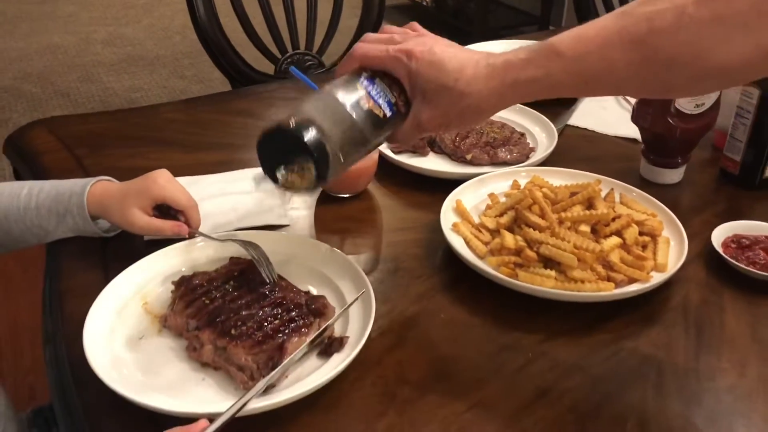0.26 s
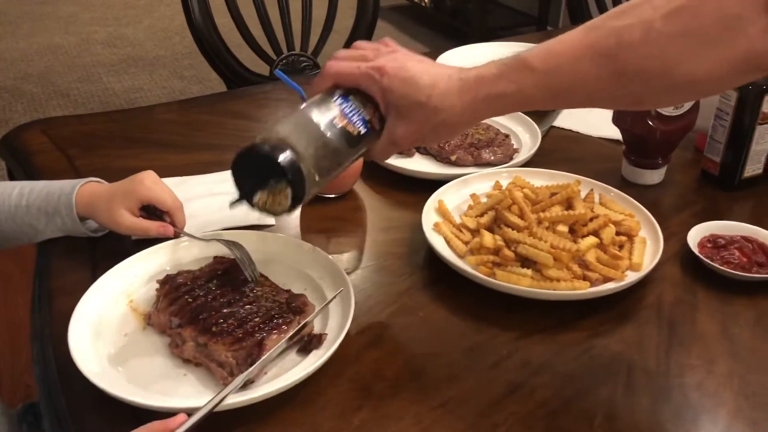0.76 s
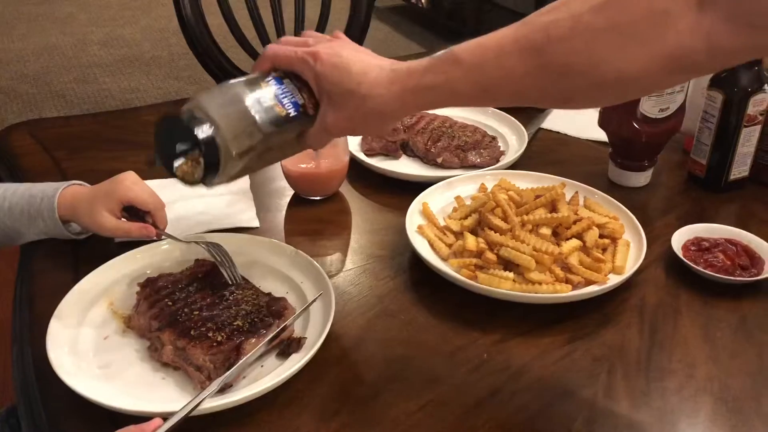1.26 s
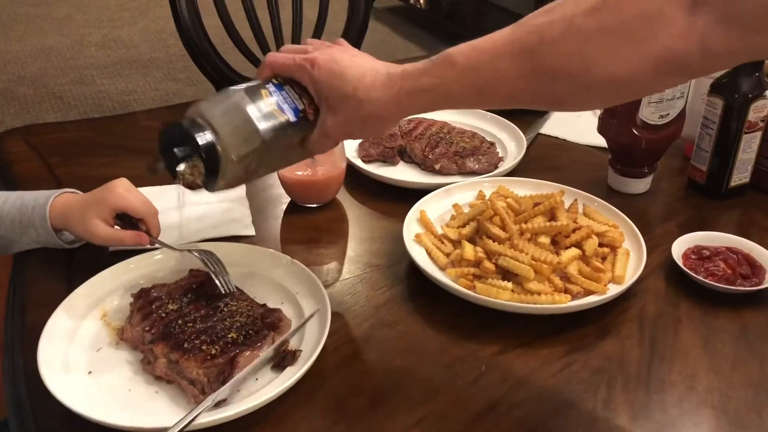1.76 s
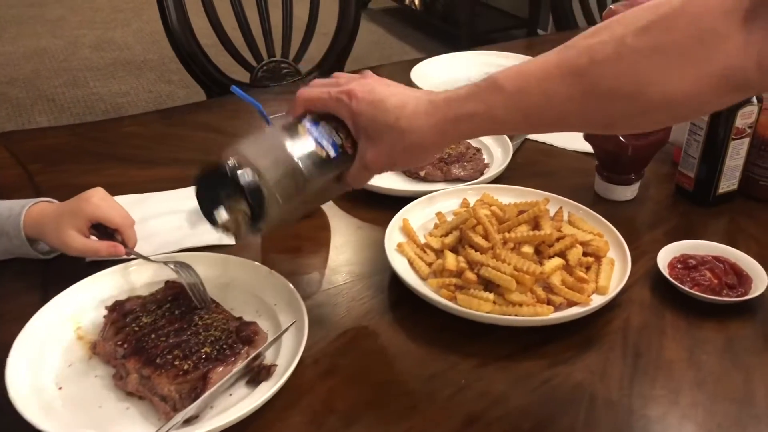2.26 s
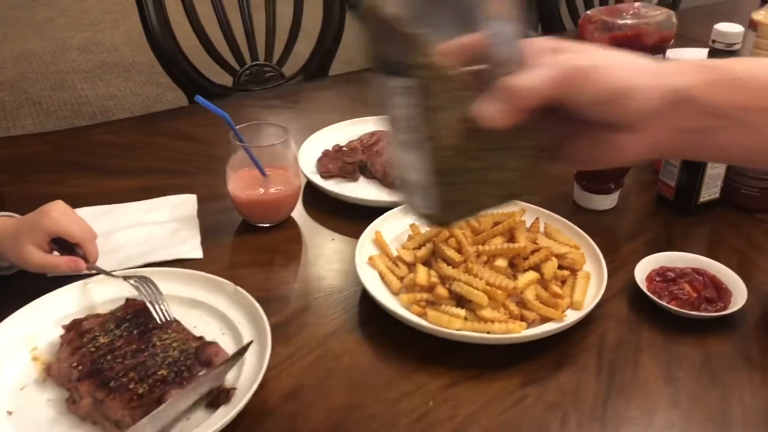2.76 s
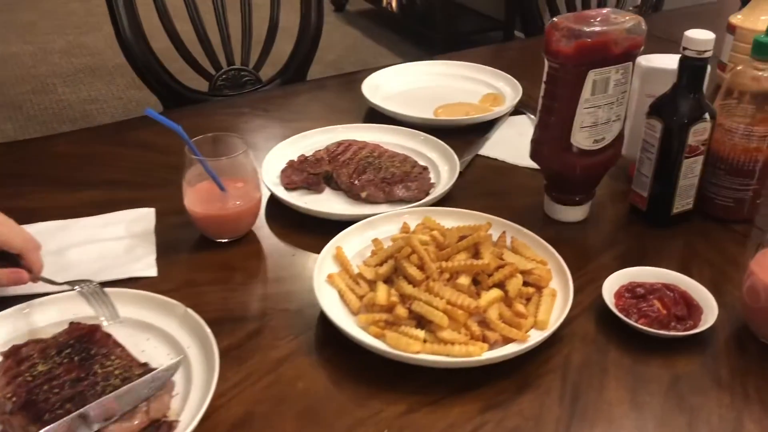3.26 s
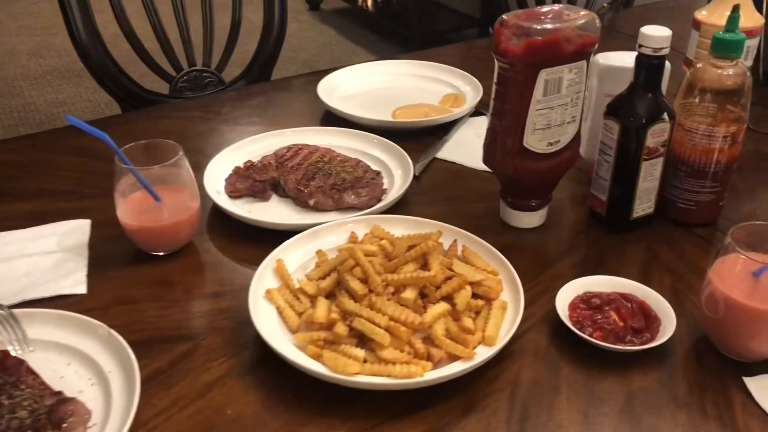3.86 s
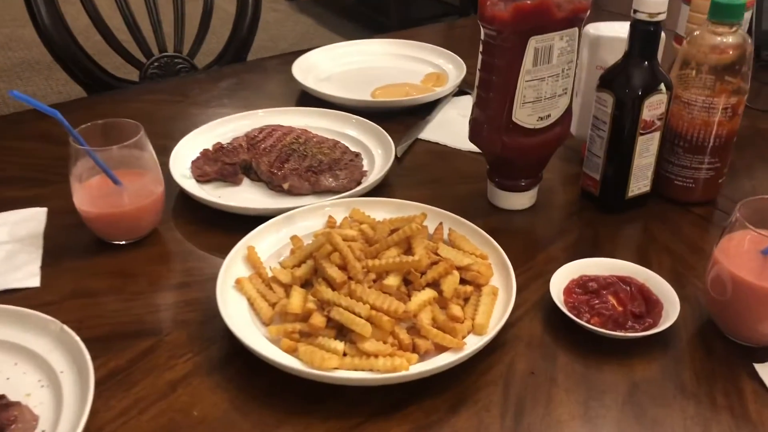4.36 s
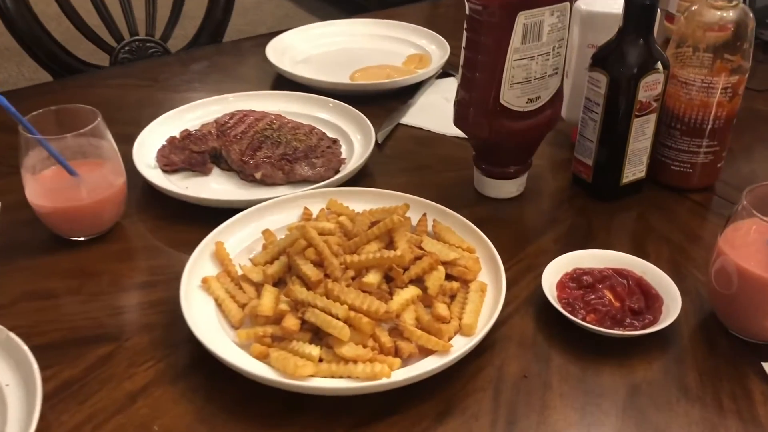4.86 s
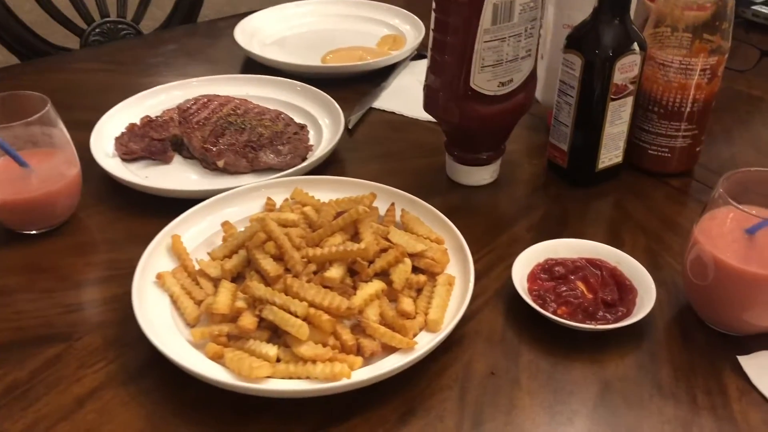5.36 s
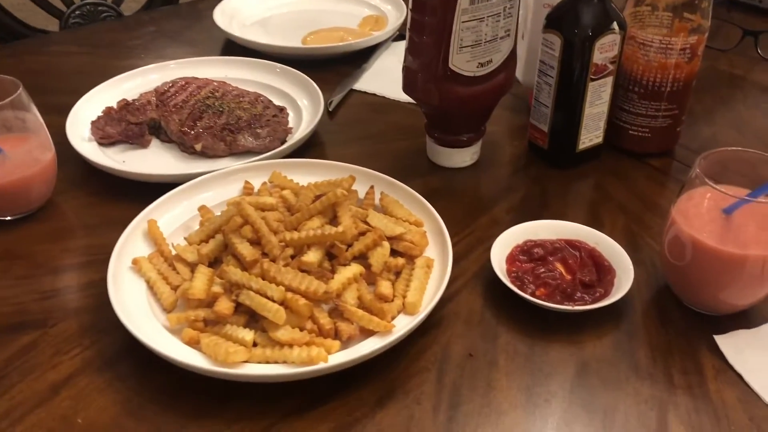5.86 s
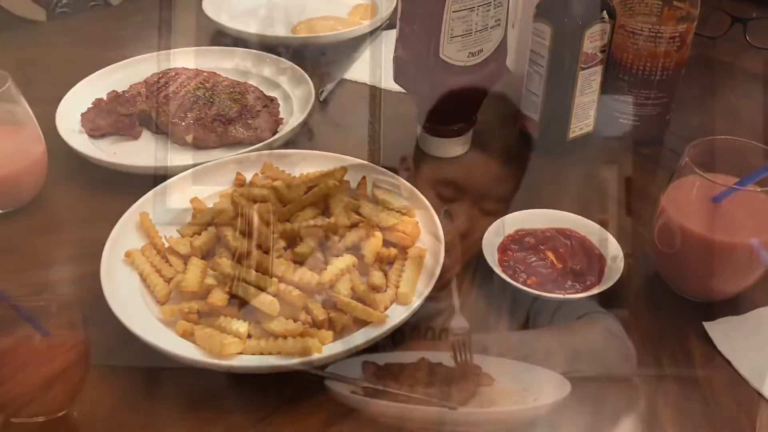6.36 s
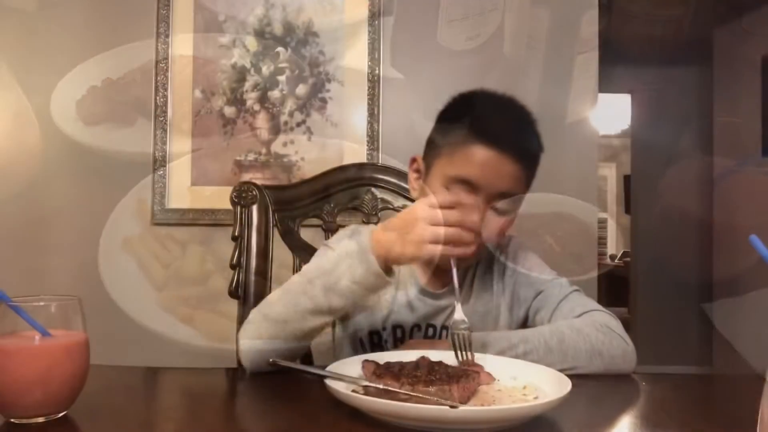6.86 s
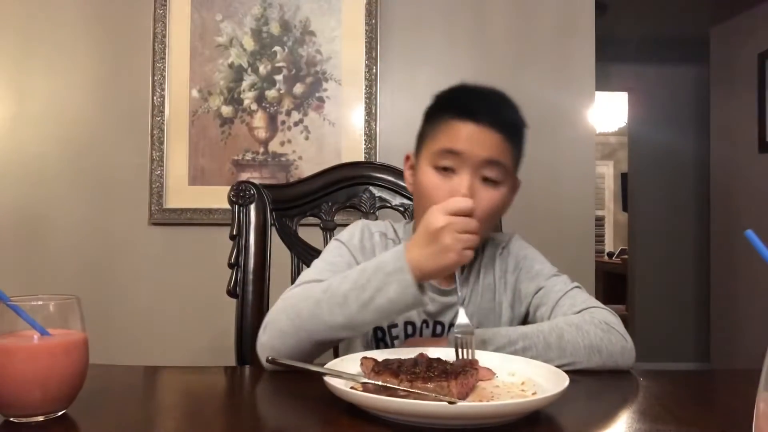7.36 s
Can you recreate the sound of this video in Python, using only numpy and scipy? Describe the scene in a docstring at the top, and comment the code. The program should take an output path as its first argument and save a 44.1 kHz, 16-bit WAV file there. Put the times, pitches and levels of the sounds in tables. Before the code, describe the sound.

A seasoning jar is shaken in quick gritty strokes, then a knife clinks sharply, a plate lands with a loud clack, and a water-like hiss swells.

```python
"""Steak at the dinner table

One close microphone at a dinner table, in a small halo of dining-room echo; both channels carry the same sound.
A jar scatters seasoning grains in strokes, then tips upright: slides and tumbles of grains. Dry ticks fall around it.
Clothes rustle as shaped noise, bumps ring floor modes, and a plastic lid snaps in falling chirps.
A knife rings and scrapes in steel modes and knocks the plate through the meat; a plate lands with a loud clink
of china modes. At the end a dense spray of grains, like a kitchen tap, swells to a hiss over low room noise."""
import sys
import numpy as np
from scipy import signal
from scipy.fft import rfft, irfft, next_fast_len
from scipy.io import wavfile
from scipy.ndimage import map_coordinates

SR = 44100
rng = np.random.default_rng(int(sys.argv[2]) if len(sys.argv) > 2 else 0)


def put_to_file(sound):
    """Save the sound as 16-bit audio at rate SR, in the file named by the first command-line argument."""
    columns = np.atleast_2d(sound).T  # one column per channel
    safe = np.clip(columns, -1, 1)
    whole_steps = np.round(safe * 32767)
    wavfile.write(sys.argv[1], SR, whole_steps.astype(np.int16))


N = 335160

# All levels are relative: each source trims them and adds its share of room.
# Every "spectrum" lists: frequency_hz [Hz], density_db [dB per Hz, relative]

# The room and the microphone
AIR_SPECTRUM = [(15, -48), (25, -9), (91, -10), (194, -12), (261, -11), (316, -12), (414, -19),
                (672, -21.5), (729, -21.5), (1120, -27.5), (1220, -24), (1510, -28.5), (4210, -34),
                (4570, -34.5), (15800, -40)]  # quiet room noise, spectrum
# how long the dining room rings: frequency_hz [Hz], t60_s [s]
ROOM_DECAY = [(100, 0.88), (500, 0.87), (1500, 0.8), (4000, 0.52), (8000, 0.35), (15000, 0.26)]
MIC_TOP_HZ = 15900

# The jar: strokes that throw seasoning into the lid: peak_s [s], level_db [dB]
SHAKES = [(.008, -37.5), (0.139, -40.5), (0.266, -46), (0.401, -47.5), (0.525, -53), (.63, -55.5),
          (0.924, -55.5), (1.053, -59), (1.191, -55), (1.325, -50.5), (1.449, -45.5), (1.579, -42),
          (1.706, -48), (1.84, -48.5), (1.985, -49.5), (2.123, -46.5), (2.254, -47.5)]
SEASONING_SPECTRUM = [(290, -8.5), (500, 1), (668, -23), (749, -8), (1240, -8.5), (1660, -2), (2030, -6),
                      (3270, -5.5), (8010, -2), (14900, -5), (15800, -5.5)]  # grains hitting the lid, spectrum
JAR_SPECTRUM = [(600, -7.5), (1500, -21), (2050, 1.5), (2800, -8.5), (4000, -3.5), (5000, -2), (6500, -14),
                (15000, -24.5)]  # the jar's walls, spectrum
SLIDING_SPECTRUM = [(290, -23), (500, -6), (537, -14), (958, -9), (2060, -6), (2520, -8.5), (4760, -5),
                    (6360, -7.5), (14500, -9), (15800, -14)]  # grains sliding along the jar, spectrum
# seasoning slides back each time the jar tips: centre_s [s], level_db [dB], length_s [s]
SLIDES = [(2.49, -53.5, 0.06), (2.559, -50.5, 0.14), (2.782, -55, 0.1), (3.107, -61, 0.09),
          (3.25, -52.5, 0.066)]
SLIDE_RISE = 0.36  # share of a slide's length spent gathering speed
# coarse pieces tumble after it: peak_s [s], level_db [dB]
TUMBLES = [(2.76, -50.5), (2.826, -49.5), (2.89, -57.5)]
TUMBLE_RISE_S, TUMBLE_FALL_S = 0.0059, 0.024
SHAKING_END_S, TRICKLE_DB = 2.33, -69.5  # seasoning trickles while the jar is upside down

# clearest coarse grains and small ticks: start_s [s], treble_db [dB], mid_db [dB against the treble]
TICKS = [(0.4513, -37, -12), (0.8913, -48, -16), (1.1607, -44, -23), (1.713, -32, -17),
         (2.0256, -40.5, -7.5), (2.759, -38.5, -9), (2.8263, -43, -4), (4.0248, -42, -16.5),
         (5.254, -48, -4.5)]
# fainter ticks, randomly placed: from_s [s], to_s [s], rate [ticks per second], treble_db [dB]
STRAYS = [(.4, 2.3, 6, -45), (4.061, 4.25, 23, -50)]
STRAY_SPREAD_DB, STRAY_MID_DB = 2.5, -12.5  # scatter of their level; midrange against the treble

# The knife: steel modes: mode_hz [Hz], struck_db [dB], scraped_db [dB]
STEEL_MODES = [(1520, -51.5, -69), (2515, -41, -62), (2670, -38.5, -58), (3300, -48.5, -55),
               (3997, -66, -49), (5530, -44, -50.5), (6370, -38, -45), (6420, -44.5, -46),
               (6980, -36.5, -63.5), (7050, -37, -40.5), (7740, -50, -43), (7760, -36.5, -51.5),
               (8270, -32, -53), (9250, -33.5, -37), (10220, -58, -40), (11440, -45, -46.5),
               (12100, -47.5, -43), (13150, -37.5, -56), (13950, -41, -38), (14540, -45, -72),
               (15130, -40, -58)]
# blade contacts: start_s [s], level_db [dB]
TOUCHES = [(1.233, -25.5), (4.38, -24), (4.416, 2.5), (4.428, -6.5), (4.435, -8)]
# teeth catch on the bare plate: centre_s [s], level_db [dB]
CATCHES = [(4.472, -41.5), (4.486, -35)]
CATCH_RISE_S, CATCH_FALL_S = 0.00506, 0.013
# strokes through the steak: centre_s [s], level_db [dB]
CUTS = [(3.55, -61), (3.8, -65), (3.9, -62)]
CUT_RISE_S, CUT_FALL_S = 0.041, 0.075

# Clothes, a swish for each movement: centre_s [s], level_db [dB], rise_s [s], fall_s [s]
SWISHES = [(3.1, -61, 0.033, 0.12), (3.245, -58, 0.047, 0.058), (3.565, -57.5, 0.092, 0.21),
           (3.67, -51, 0.047, 0.045), (3.787, -45.5, 0.019, 0.044), (3.935, -54.5, 0.089, 0.031),
           (4.49, -51.5, 0.06, 0.035), (4.8, -56, 0.02, 0.044), (4.91, -47, 0.036, 0.049)]
FABRIC_SPECTRUM = [(240, -12), (400, -6), (644, -9), (837, -7.5), (961, -5.5), (1620, -7), (2460, -4.5),
                   (2570, -5), (2780, -5.5), (4690, -3), (10300, -16.5), (11800, -17.5), (15800, -27)]  # fabric rubbing on fabric, spectrum
STIR_FROM_S, STIR_TO_S, STIR_DB = 2.3, 5.28, -72  # faint rustle of someone on the move

# Steps and soft bumps: start_s [s], level_db [dB], centre_hz [Hz], scuff_db [dB against the blow]
BUMPS = [(3.054, -54, 326, 3.5), (3.534, -41, 99, -11), (3.554, -46.5, 149, -12), (4.533, -28, 115, -15),
         (4.564, -37, 178, -23), (4.734, -45, 194, -4), (4.848, -48.5, 179, 3), (7.252, -43, 266, -2)]
# wooden floor modes: mode_hz [Hz], level_db [dB], t60_s [s]
FLOOR_MODES = [(105.5, -0.5, 0.13), (173.2, 0, 0.21), (267, 0.5, 0.11), (328, -12, 0.11)]

# The blade bumps the plate through the meat: start_s [s], level_db [dB]
KNOCKS = [(3.507, -54), (3.528, -50), (3.57, -54), (3.665, -53), (3.714, -48), (3.79, -43)]
KNOCK_T60_S, KNOCK_MUFFLE_HZ = 0.056, 2400  # the steak damps the china and softens the blow

# Lid snaps: start_s [s], level_db [dB], sweep_hz [Hz above the lowest], lowest_hz [Hz], hollow_db [dB]
SNAPS = [(3.8744, -22, 5760, 800, -7.5), (3.928, -16.5, 11120, 872, -2)]

# The plate: china modes: mode_hz [Hz], blow_db [dB], ring_db [dB], ring_t60_s [s, before overall damping]
CHINA_MODES = [(359.4, -35.5, -36, 0.38), (542, -29, -35.5, 0.46), (847, -37.5, -28.5, 0.27),
               (1120, -33, -47, 0.92), (1340, -29.5, -42, 0.8), (1580, -27.5, -35.5, 0.94),
               (1963, -39, -36.5, 0.35), (2525, -25, -51, 0.36), (2650, -29, -50, 0.52),
               (2780, -25, -42, 0.38), (2990, -29, -46, 0.99), (3100, -40, -48, 0.67),
               (3670, -21.5, -45.5, 0.95), (3954, -25.5, -41, 0.41), (4000, -35, -53, 0.58),
               (3990, -27, -59, 0.65), (4193, -28, -61, 0.46), (4770, -29, -53, 0.37),
               (4934, -30, -37, 0.52), (5630, -43, -51, 0.77), (6200, -26.5, -40.5, 0.77),
               (7190, -28.5, -52, 0.42), (7420, -34, -55, 0.36), (7970, -27.5, -53, 0.62),
               (8150, -31.5, -58, 0.49), (9340, -22.5, -64, 0.36), (9900, -44, -60, 0.3),
               (10960, -32, -60, 0.38), (12600, -41, -54, 0.34), (14510, -41, -64, 0.47)]
# the plate's foot settles: start_s [s], level_db [dB]
CONTACTS = [(5.8848, -1), (5.8904, -2), (5.8961, -7)]
CLACK_SPECTRUM = [(47, -45), (80, -3), (1580, -24), (2210, -2), (3670, 5), (4480, -19), (4890, 1),
                  (5350, -20), (6240, -8), (7960, -15), (8700, -29), (9500, -22), (10400, -30),
                  (11300, -19), (15800, -45)]  # noise of the china's contact, spectrum

# The tap
WATER_SPECTRUM = [(53, -44), (90, -22), (145, 1.5), (218, -6.5), (271, -2), (322, -7), (542, -7),
                  (910, -9.5), (1820, -6.5), (2160, -5), (3190, -6), (3550, -3.5), (7570, -3.5),
                  (14500, -11), (15800, -7)]  # droplets of the stream, spectrum
# splashes in the stream: peak_s [s], level_db [dB]
SPURTS = [(6.575, -50.5), (6.708, -45.5), (6.885, -48), (7.029, -39.5)]
TAP_OPEN_S, TAP_OPENING_S, TAP_DB = 6.073, 1.0, -43.5  # start of the hiss, time to swell, mean held level
TAP_CURVE, TAP_WAVER_DB = 1.19, 1  # power law of the swell; unsteadiness of the stream


def amp(db):
    """Decibels to gain."""
    return 10 ** (np.asarray(db) / 20)


def unit(x):
    """x at rms 1."""
    return x / np.sqrt(np.mean(x ** 2) + 1e-20)


def clock(count=N):
    """Seconds, sample by sample."""
    return np.arange(count) / SR


def noise(count=N):
    """White noise."""
    return rng.standard_normal(count)


def fade(t, t60):
    """A decay of 60 dB in t60 seconds."""
    return np.exp(-np.log(1000) * t / t60)


def along(points, hz):
    """Interpolate (Hz, value) points on a log frequency axis."""
    point_hz, value = np.transpose(points)
    return np.interp(np.log(hz + 1), np.log(point_hz + 1), value)


def add(track, s, sound):
    """Mix a sound into the track at s seconds."""
    start = max(round(s * SR), 0)
    track[start:start + len(sound)] += sound[:N - start]


def filtered(x, response):
    """x times a response of frequency, padded against wrap-around."""
    size = next_fast_len(len(x) + 8192)
    spectrum = rfft(x, size) * response(np.fft.rfftfreq(size, 1 / SR))
    return irfft(spectrum, size)[:len(x)]


def coloured(x, spectrum):
    """x with the given spectrum, at rms 1."""
    return unit(filtered(x, lambda hz: amp(along(spectrum, hz))))


def grains(spectrum, rate, smooth):
    """Tiny impacts of random size, rate a second, each a brief crackle, on a bed of smooth noise."""
    hits = (rng.random(N) < rate / SR) * rng.exponential(size=N)
    energy = np.convolve(hits, fade(clock(64), 0.00081))[:N]
    level = np.sqrt(energy / energy.mean() + smooth ** 2)
    return coloured(level * noise(), spectrum)


def wobble(rate):
    """A smooth random curve, rate knots a second."""
    knots = rng.standard_normal(int(N * rate / SR) + 4)
    return map_coordinates(knots, [clock() * rate])


def sines(hz, t, width_hz=0):
    """One sine per mode, from rest; a wandering phase makes each line about width_hz wide."""
    steps = rng.standard_normal((len(hz), len(t)))
    drift = np.cumsum(steps, axis=1) * np.sqrt(2 * np.pi * abs(width_hz) / SR)
    return np.sin(2 * np.pi * hz[:, None] * t + drift)


def rubbed(hz, dbs, width_hz, count):
    """Noise of rms 1 that rings in the given modes."""
    def response(f):
        power = sum(amp(2 * db) / (1 + ((f - centre) / width_hz) ** 2) for centre, db in zip(hz, dbs))
        return np.sqrt(power)
    return unit(filtered(noise(count), response))


def burst(s, rise, fall):
    """A sharp swell that peaks at s seconds; rise and fall are time constants."""
    t = clock() - s
    return np.exp(np.minimum(t / rise, -t / fall))


def swell(s, rise, fall):
    """A rounded swell around s seconds; rise and fall are time constants."""
    t = clock() - s
    return np.sqrt(2 * np.exp(-np.logaddexp(-2 * t / rise, 2 * t / fall)))


def held(start, end, edge_s):
    """A gain near 1 from start to end, with soft edges."""
    opening = 1 + np.tanh((clock() - start) / edge_s)
    closing = 1 + np.tanh((end - clock()) / edge_s)
    return opening * closing / 4


def together(envelopes):
    """Envelopes of unrelated noises add in power."""
    return np.sqrt(sum(e ** 2 for e in envelopes))


def echo(x, gap=0.007):
    """The dining room's answer, which starts after gap seconds and dies sooner in the treble."""
    hz, t, z = signal.stft(noise(SR), SR, nperseg=256)
    near_walls = 1 + 2.0 * fade(t, 0.095)
    decay = fade(t, along(ROOM_DECAY, hz)[:, None])
    tail = signal.istft(z * near_walls * decay, SR, nperseg=256)[1]
    tail = tail * np.clip(clock(len(tail)) / gap - 1, 0, 1)
    return signal.fftconvolve(x, tail / np.linalg.norm(tail))[:N]


def room(x, wet_db):
    """The direct sound plus the room."""
    return x + amp(wet_db) * echo(x)


def air():
    """Low ventilation noise with a narrow, wavering drone: noise through a resonance at 330 Hz."""
    drone = filtered(noise(), lambda hz: 1 / (1 + ((hz - 330) / 35) ** 2))
    return amp(-66.0) * coloured(noise(), AIR_SPECTRUM) + amp(-69) * unit(drone)


def shaker():
    """Strokes throw grains against the lid; stragglers follow, some trickle, and all slide as the jar tips."""
    landings = together(amp(db + 1) * burst(s, rise=0.011, fall=0.017) for s, db in SHAKES)
    # stragglers land later and vary half as much in level
    stragglers = together(amp(.5 * db - 33.5) * burst(s + 0.039, rise=0.029, fall=0.041) for s, db in SHAKES)
    seasoning = grains(SEASONING_SPECTRUM, rate=2500, smooth=0.94)
    walls = amp(-16) * grains(JAR_SPECTRUM, rate=230, smooth=0.11)
    shaken = np.hypot(landings, stragglers) * (seasoning + walls)
    pouring = amp(TRICKLE_DB) * held(0, SHAKING_END_S, edge_s=0.037)
    trickle = pouring * grains(SEASONING_SPECTRUM, rate=230, smooth=0.64)
    sliding = together(amp(db) * swell(s, SLIDE_RISE * length, (1 - SLIDE_RISE) * length)
                       for s, db, length in SLIDES)
    slid = sliding * grains(SLIDING_SPECTRUM, rate=2000, smooth=0.94)
    tumbling = together(amp(db) * burst(s, TUMBLE_RISE_S, TUMBLE_FALL_S) for s, db in TUMBLES)
    tumbled = tumbling * grains(JAR_SPECTRUM, rate=790, smooth=0.42)
    return room(shaken + trickle + slid + tumbled, wet_db=-13)


def strays():
    """Rows like TICKS: one tick at a random moment in each equal slot of a stretch."""
    rows = []
    for start, end, rate, db in STRAYS:
        for slot in range(round((end - start) * rate)):
            s = start + (slot + rng.random()) / rate
            level_db = db + STRAY_SPREAD_DB * rng.uniform(-1.04, 1)
            rows.append((s, level_db, STRAY_MID_DB))
    return rows


def ticks():
    """Dry ticks a few milliseconds long: a bright snick and a slower, lower click, both decaying noise."""
    out, t = np.zeros(N), clock(2048)
    snick_spectrum = [(1000, -22), (4000, -13), (7000, 0.5), (15000, -1)]
    click_spectrum = [(300, -13), (1200, -4.5), (2000, 2), (4500, -1), (8000, -14)]
    for s, db, mid_db in TICKS + strays():
        snick = fade(t, 0.012) * coloured(noise(len(t)), snick_spectrum)
        click = fade(t, 0.022) * coloured(noise(len(t)), click_spectrum)
        add(out, s, amp(db - 5.5) * snick + amp(db + mid_db - 0.5) * click)
    return room(out, wet_db=-5)


def knife():
    """The blade rings when it touches the plate; dragging it feeds the same modes with rough friction."""
    hz, struck_db, scraped_db = np.transpose(STEEL_MODES)
    touched, t = np.zeros(N), clock(SR // 2)
    for s, db in TOUCHES:
        decay = fade(t, 0.055) + amp(-12.0) * fade(t, 0.073)
        ring = amp(struck_db) @ sines(hz, t, width_hz=28) * decay
        chatter = amp(-30) * fade(t, 0.03) * rubbed(hz, struck_db, width_hz=110, count=len(t))
        onset = 1 - np.exp(-t / 0.00067)
        add(touched, s, amp(db) * (ring + chatter) * onset)
    catching = amp(1.8 * wobble(150))  # the teeth catch and slip
    dragging = together(amp(db) * swell(s, CATCH_RISE_S, CATCH_FALL_S) for s, db in CATCHES)
    scrape = catching * dragging * rubbed(hz, scraped_db, width_hz=33, count=N)
    cutting = together(amp(db) * swell(s, CUT_RISE_S, CUT_FALL_S) for s, db in CUTS)
    dull_db = scraped_db - 7.9 * np.log2(hz / hz[0])  # meat around the blade damps its high modes
    sawing = catching * cutting * rubbed(hz, dull_db, width_hz=44, count=N)
    return room(touched + scrape + sawing, wet_db=-6.5)


def clothes():
    """Fabric rubs on fabric with each movement, and stirs faintly in between."""
    swishes = together(amp(db) * swell(s, rise, fall) for s, db, rise, fall in SWISHES)
    stir = amp(STIR_DB) * held(STIR_FROM_S, STIR_TO_S, edge_s=0.28)
    fabric = grains(FABRIC_SPECTRUM, rate=2500, smooth=1.6)
    return room(amp(-1) * np.hypot(swishes, stir) * fabric, wet_db=-5.5)


def bumps():
    """Each soft blow rings the floor modes nearest its own pitch, over a loose rumble and a brief scuff."""
    mode_hz, mode_db, t60 = np.transpose(FLOOR_MODES)
    out, t = np.zeros(N), clock(SR // 2)
    scuff_spectrum = [(100, -13.5), (330, -6.5), (700, -10.5), (1500, -14.5), (3000, -26), (12000, -56)]
    onset = 1 - np.exp(-t / 0.0033)
    for s, db, hz, scuff_db in BUMPS:
        reach = np.exp(-2 * np.log2(mode_hz / hz) ** 2)
        ringing = sines(mode_hz, t, width_hz=3.8) * fade(t, t60[:, None])
        wood = (reach * amp(mode_db + 1.5)) @ ringing
        loose = [(hz / 4, -20), (hz / 2, -7), (hz, -2), (2 * hz, -4),
                 (3.4 * hz, -16), (12 * hz, -44), (60 * hz, -90)]
        rumble = amp(-4.5) * coloured(noise(len(t)), loose) * fade(t, 0.24)
        scuff = amp(scuff_db) * coloured(noise(len(t)), scuff_spectrum) * fade(t, 0.058)
        add(out, s, amp(db - 2.5) * ((wood + rumble) * onset + scuff))
    return room(out, wet_db=-6.5)


def knocks():
    """Cushioned by the steak, the blade rings mainly the plate's low modes, and briefly."""
    hz = np.transpose(CHINA_MODES)[0]
    out, t = np.zeros(N), clock(SR // 8)
    softness = 1 / (1 + (hz / KNOCK_MUFFLE_HZ) ** 6)
    onset = 1 - np.exp(-t / .0012)
    for s, db in KNOCKS:
        strength = softness * amp(rng.normal(0, 3.4, len(hz)))  # each knock favours other modes
        ring = (strength / np.linalg.norm(strength)) @ sines(hz, t, width_hz=31)
        add(out, s, amp(db + 2.0) * ring * fade(t, KNOCK_T60_S) * onset)
    return room(out, wet_db=-13)


def lid():
    """A snap spreads through thin plastic as a bending wave: treble first, then the lid's own low note."""
    crack, body, hollow, t = np.zeros(N), np.zeros(N), np.zeros(N), clock(1024)
    window = np.exp(-(t / 0.0045) ** 4) * (1 - np.exp(-t / 0.001))
    for s, db, sweep_hz, lowest_hz, hollow_db in SNAPS:
        pitch_hz = lowest_hz + sweep_hz * np.exp(-t / 0.000644)
        wave = np.sin(2 * np.pi * np.cumsum(pitch_hz) / SR) * window
        add(body, s, amp(db - 7.0) * wave)
        add(hollow, s, amp(db + hollow_db) * wave)
        splinter_spectrum = [(100, -10), (400, 1), (2000, -3), (3000, 2),
                             (0.56 * sweep_hz, -5), (sweep_hz, -10), (1.3 * sweep_hz, -18)]
        splinter = coloured(noise(len(t)), splinter_spectrum)
        add(crack, s, amp(db - 7.0) * fade(t, 0.015) * splinter)
    hollow_response = [(400, -7), (900, -17.0), (1450, -1.0), (2400, -14), (12000, -43.5)]
    hollow = filtered(hollow, lambda hz: amp(along(hollow_response, hz)))
    return room(crack, wet_db=-9) + body + echo(hollow, gap=0.0035)


def plate():
    """China clacks down in three quick contacts; the table damps the blow and leaves a thin after-ring."""
    hz, blow_db, ring_db, t60 = np.transpose(CHINA_MODES)
    out, t = np.zeros(N), clock(SR // 2)
    shape = (-1) ** np.arange(len(hz))  # neighbouring modes swing in opposite directions
    for s, db in CONTACTS:
        blow = (shape * amp(blow_db + 2)) @ sines(hz, t, width_hz=32) * fade(t, 0.037)
        clack = amp(-19.5) * fade(t, 0.041) * coloured(noise(len(t)), CLACK_SPECTRUM)
        add(out, s, amp(db) * (blow + clack) * (1 - np.exp(-t / 0.00025)))
    ringing = sines(hz, t, width_hz=12.7) * fade(t, t60[:, None])
    ring = amp(ring_db - 5.0) @ ringing * fade(t, 2.9)
    table_spectrum = [(50, -35), (120, 8), (190, 2), (400, -7), (1500, -16), (8000, -80)]
    table = amp(-40.5) * fade(t, 0.36) * coloured(noise(len(t)), table_spectrum)
    add(out, CONTACTS[0][0], (ring + table) * (1 - np.exp(-t / 0.005)))
    # a small plate moves no deep bass
    highpass = signal.butter(2, 120, "highpass", fs=SR, output="sos")
    return room(signal.sosfilt(highpass, out), wet_db=-11)


def tap():
    """A fine spray of droplets swells to a steady hiss, with brief splashes."""
    opening = np.clip((clock() - TAP_OPEN_S) / TAP_OPENING_S, 0, 1)
    flow = amp(TAP_DB + TAP_WAVER_DB * wobble(13)) * opening ** TAP_CURVE
    splashes = sum(amp(db) * burst(s, rise=0.0057, fall=0.034) for s, db in SPURTS)
    return np.hypot(flow, splashes) * grains(WATER_SPECTRUM, rate=6000, smooth=1.3)


def scene():
    """Everything reaches the one microphone, copied to both channels."""
    table_sounds = shaker() + ticks() + knife() + knocks() + lid() + plate()
    mono = air() + table_sounds + clothes() + bumps() + tap()
    return np.array([mono, mono])


def record(dry):
    """The microphone drops the deepest bass, below about 36 Hz, and keeps nothing above its band limit."""
    def response(hz):
        bass_cut = hz ** 3 / np.hypot(hz ** 3, 36 ** 3)
        return (hz < MIC_TOP_HZ) * bass_cut
    return np.array([filtered(channel, response) for channel in dry])


dry = scene()
out = record(dry)
put_to_file(out)
```